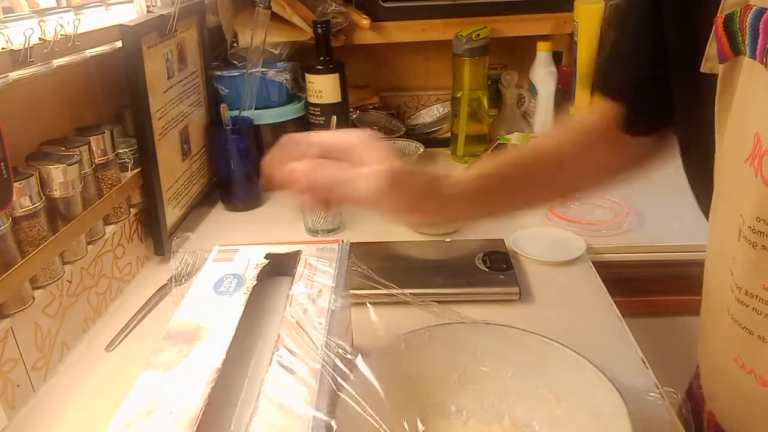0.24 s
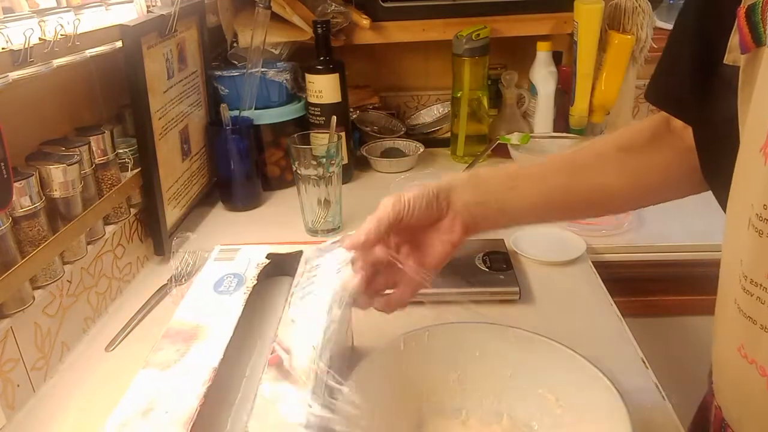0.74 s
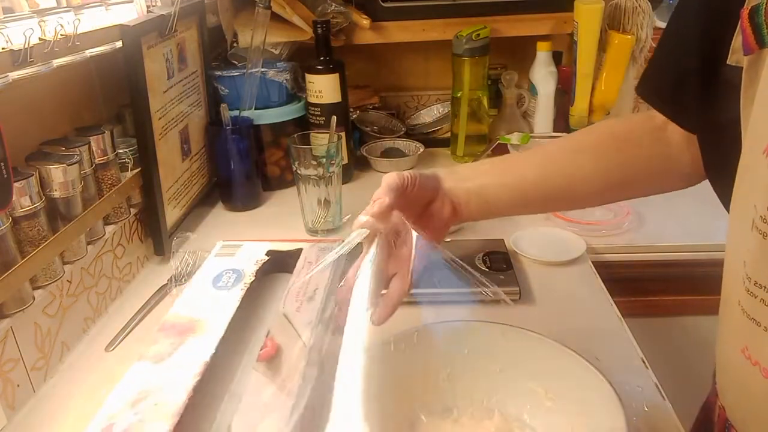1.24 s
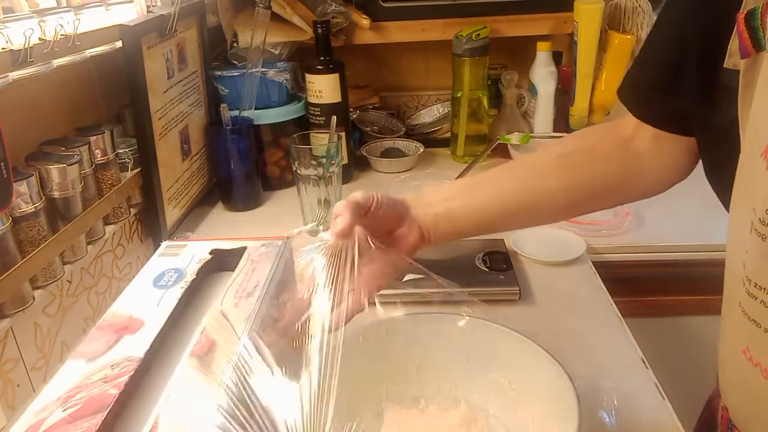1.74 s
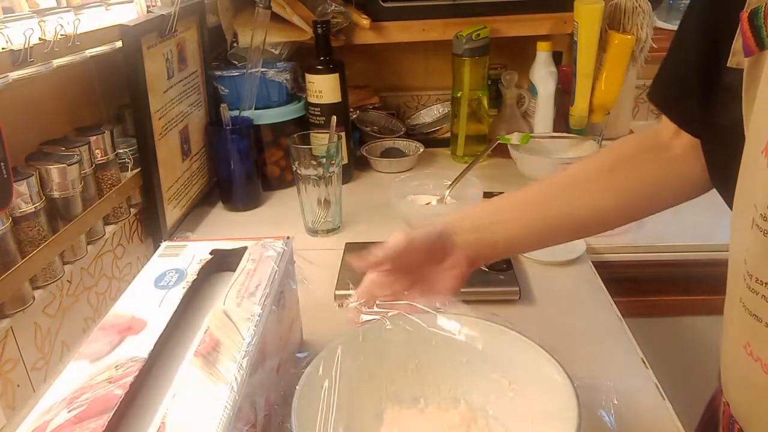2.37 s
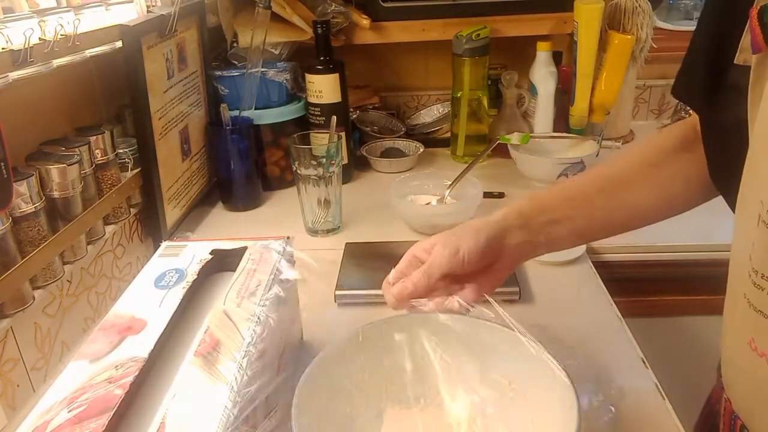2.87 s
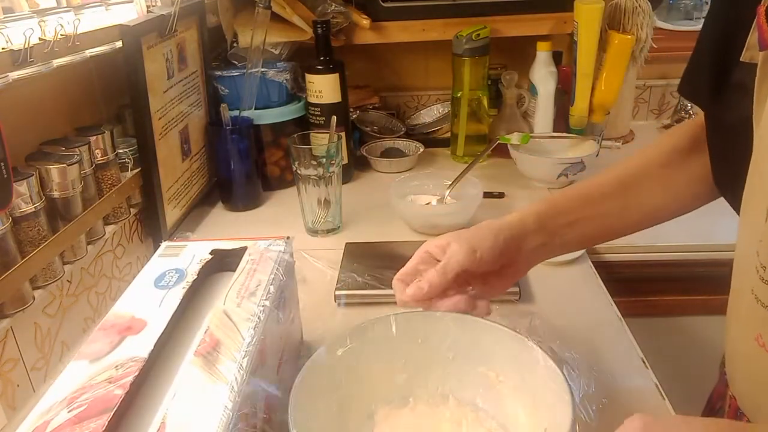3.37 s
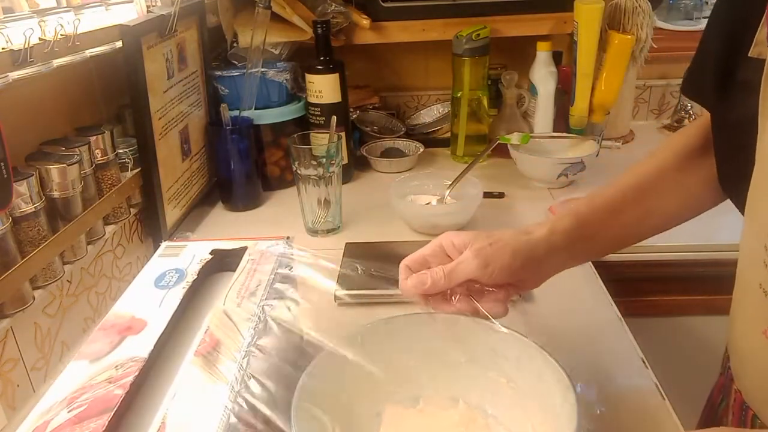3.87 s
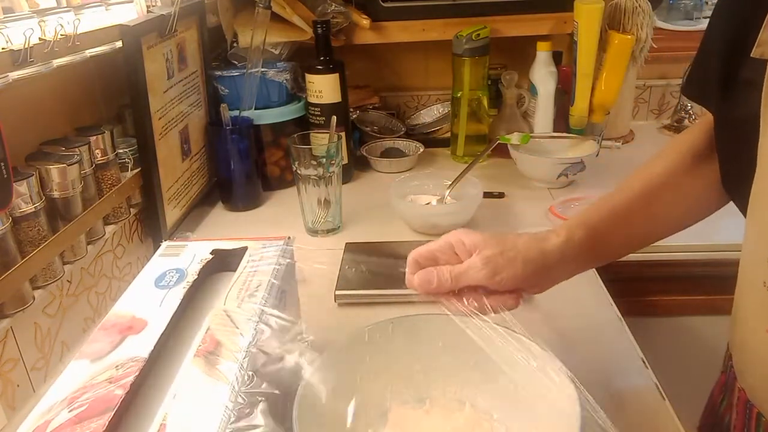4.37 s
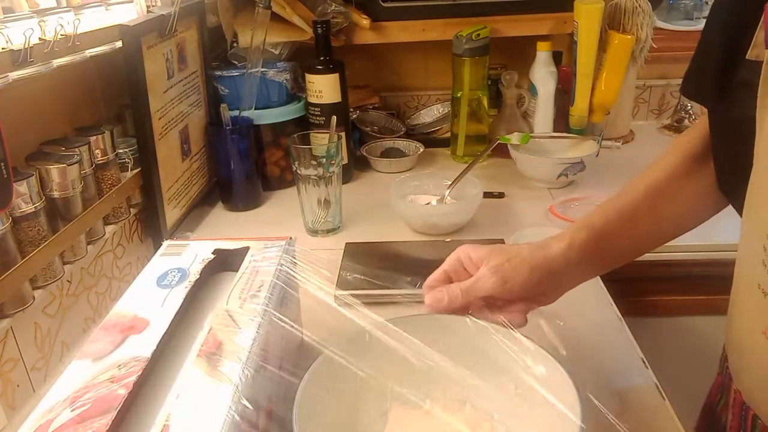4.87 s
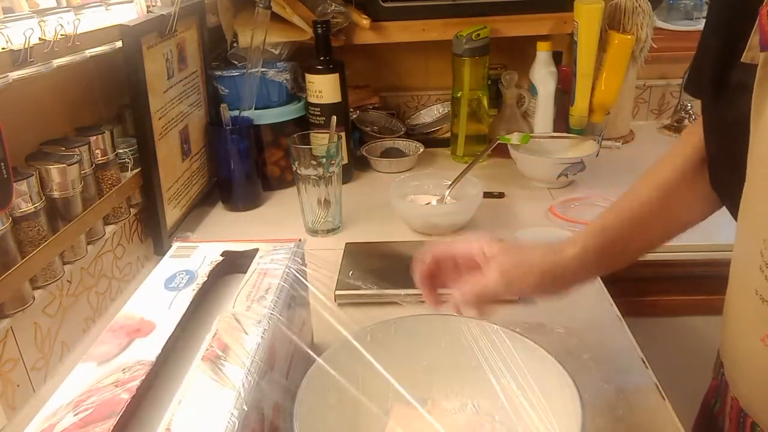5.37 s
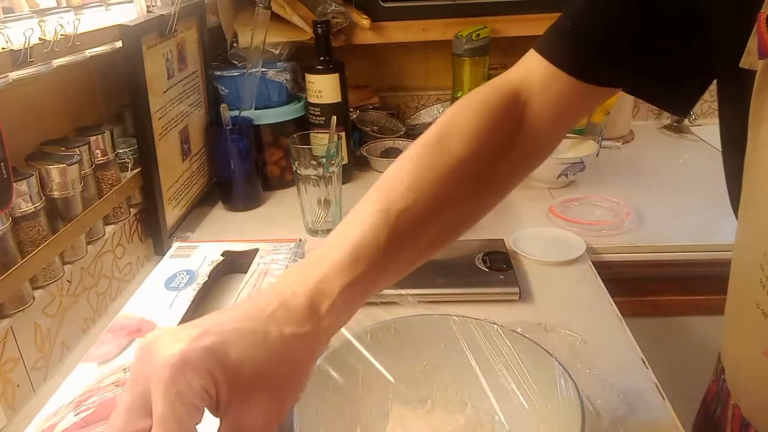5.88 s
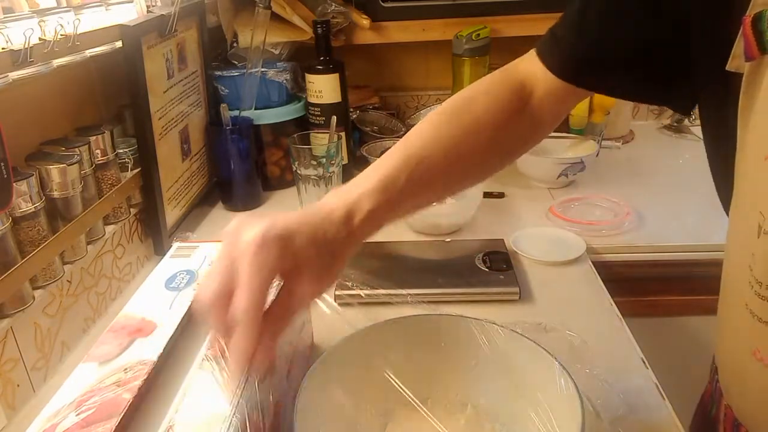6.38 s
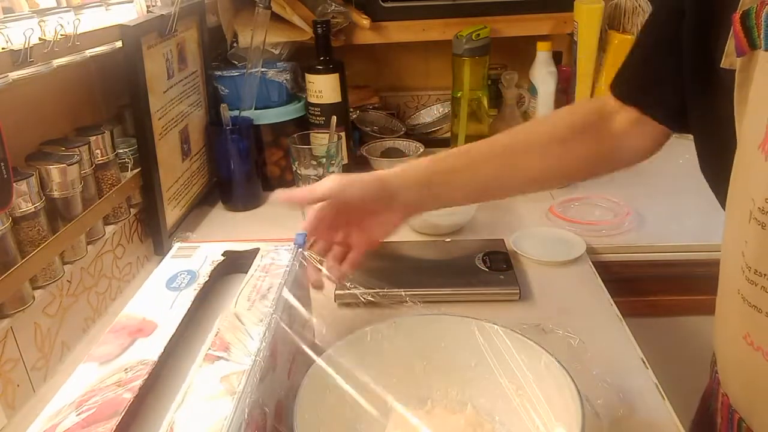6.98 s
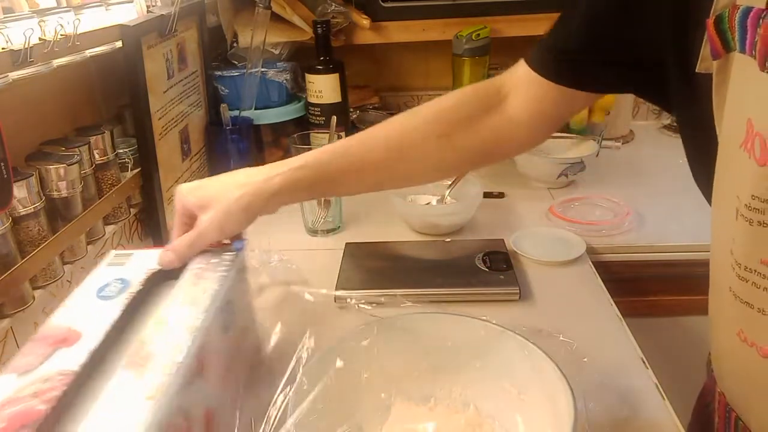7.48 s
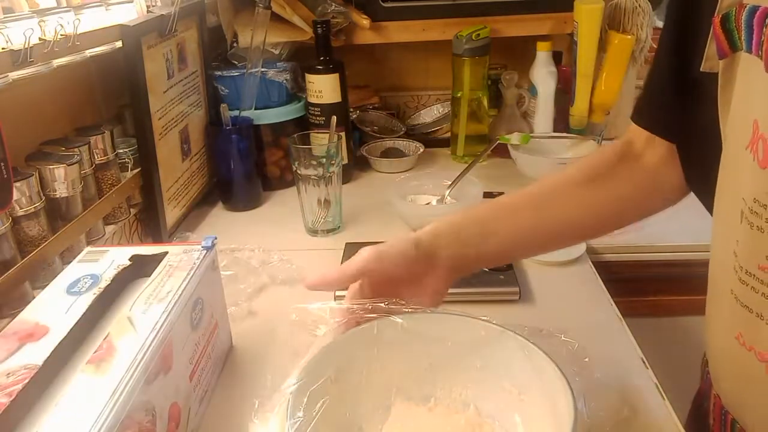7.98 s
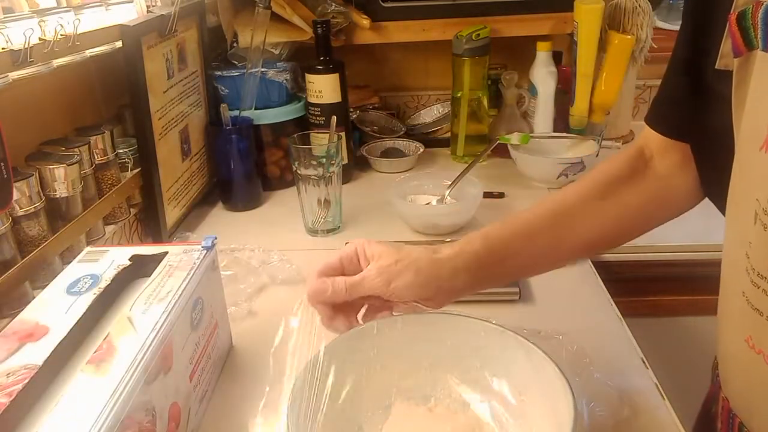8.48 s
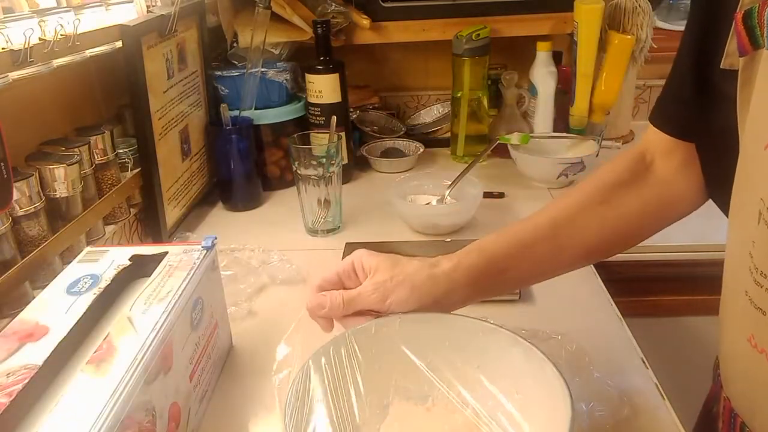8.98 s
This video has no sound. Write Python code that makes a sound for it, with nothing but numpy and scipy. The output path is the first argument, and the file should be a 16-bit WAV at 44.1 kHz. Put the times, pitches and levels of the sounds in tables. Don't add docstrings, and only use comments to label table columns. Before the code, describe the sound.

Close stereo pickup in a small hard kitchen. Loud crackling and box thumps open as film is pulled out, then fade to near quiet. Bright snaps and rustling flurries follow as the film is draped over a bowl. A cutting movement brings a sharp crackle and hollow thuds, then softer pressing, small creaky snaps and faint glass taps over a low hum.

```python
import sys
import numpy as np
from scipy import signal
from scipy.fft import rfft, irfft
from scipy.io import wavfile
from scipy.ndimage import uniform_filter1d

SR = 44100
rng = np.random.default_rng(int(sys.argv[2]) if len(sys.argv) > 2 else 0)


def nominal_scale(level):
    x = np.asarray(level, float) / 20
    return 10 ** x


def waveform_to_disk(signal):
    frames = np.transpose(np.atleast_2d(signal))
    scaled = np.clip(frames, -1, 1) * 32767
    samples = np.round(scaled).astype(np.int16)
    wavfile.write(sys.argv[1], SR, samples)


N = 406602

# columns start_s [s], left_right_db [dB]
HAND_PLACE = [(0.0, 0.5), (1.56, 2), (1.93, 3.5), (2.7, -1.0), (3.0, 1.5), (5.83, 0.5), (6.29, 2.5),
              (6.96, 2.0), (9.22, 1.0)]
# columns freq_hz [Hz], level_db [dB per Hz]
FOLD_SPECTRUM = [(210, -34.5), (350, -13.5), (618, -10.5), (801, -4.5), (935, -8.5), (1160, -7),
                 (3500, -13), (4550, -34.5), (7700, -120)]
# columns freq_hz [Hz], level_db [dB per Hz]
SNAP_SPECTRUM = [(1200, -31.5), (2000, -15), (3300, -4.5), (5500, -1), (7550, 1), (10000, -3),
                 (12500, -0.5), (15500, -3.5), (17000, -6)]


def evened(x):
    return x / np.sqrt(np.mean(x ** 2) + 1e-20)


def read(points, hz):
    freq_hz, value = np.transpose(points)
    return np.interp(np.log(hz + 1), np.log(freq_hz + 1), value)


def follow(rows):
    knot_s, *columns = np.transpose(rows)
    return [np.interp(np.arange(N) / SR, knot_s, column) for column in columns]


def colour(x, points):
    hz = abs(np.fft.fftfreq(4096, 1 / SR))
    log_gain = np.log(nominal_scale(read(points, hz)) + 1e-5)
    taps = np.fft.ifft(np.exp(np.conj(signal.hilbert(log_gain)))).real[:2048]
    return signal.oaconvolve(x, taps[None] / np.linalg.norm(taps))[:, :N]


def resonate(x, hz, width_hz):
    return signal.lfilter(*signal.iirpeak(hz, hz / width_hz, SR), x)


def pair(same):
    a, b = rng.standard_normal((2, N))
    same = np.clip(same, 0, 1)
    return np.array([a, same * a + np.sqrt(1 - same ** 2) * b])


def lumpy(ms):
    size = int(ms * SR / 1000)
    once = uniform_filter1d(rng.standard_normal(N), size)
    return evened(uniform_filter1d(once, size))


def placed(at, size, pan_db, lag_per_db):
    out = np.zeros((2, N))
    for port, sign in zip(out, (1, -1)):
        lead = np.round(sign * pan_db * lag_per_db).astype(int)
        np.add.at(port, np.clip(at - lead, 0, N - 1), size * nominal_scale(sign * pan_db / 2))
    return out


def patchy(x, depth_db):
    hz, t, z = signal.stft(x, SR, nperseg=256)
    patches = rng.standard_normal((len(t), len(hz))).T
    patches = uniform_filter1d(patches, size=7, axis=0)
    patches = evened(uniform_filter1d(patches, size=9, axis=1))
    return signal.istft(z * nominal_scale(depth_db * patches), SR, nperseg=256)[1][:, :N]


def air():
    # columns freq_hz [Hz], width_hz [Hz], level_db [dB]
    hum_lines = [(320.4, 34, -79), (375.3, 22, -71), (417, 39, -78), (477.5, 16, -79)]
    # columns freq_hz [Hz], level_db [dB per Hz]
    air_spectrum = [(28, -32.5), (50, -11.5), (90, -2.5), (150, -9), (250, -5), (400, -10.5), (630, -19),
                    (1000, -28.5), (2500, -38.5), (4500, -36), (8000, -35), (16000, -39.5)]
    hum = 0
    for hz, width_hz, level_db in hum_lines:
        line = resonate(resonate(pair(same=0.7), hz, width_hz), hz, width_hz)
        hum = hum + nominal_scale(level_db) * evened(line)
    return nominal_scale(-66.5) * evened(colour(pair(same=0.54), air_spectrum)) + hum


def kitchen(x):
    # columns freq_hz [Hz], t60_s [s]
    room_decay = [(200, 0.73), (700, 0.22), (2000, 0.24), (6000, 0.19), (16000, 0.13)]
    taps = np.zeros((2, SR // 2))
    slots = np.arange(100, SR // 2 - 20, 20)
    at = slots + rng.integers(0, 20, (2, (SR // 2 - 101) // 20))
    np.put_along_axis(taps, at, rng.choice([-1., 1.], at.shape), 1)
    hz, t, z = signal.stft(taps, SR, nperseg=256)
    decay = nominal_scale(-60 * t / read(room_decay, hz)[:, None])
    tail = signal.istft(z * decay, SR, nperseg=256)[1]
    return signal.fftconvolve(x, tail / np.linalg.norm(tail[0]), axes=1)[:, :N]


def handling():
    # columns peak_s [s], crackle_db [dB], swell_s [s], fade_s [s], scuff_db [dB]
    grips = [(0.035, -28, 0.089, 0.2, -25), (0.134, -38, 0.15, 0.1, -32.5),
             (0.662, -43.5, 0.054, 0.18, -44.5), (0.838, -32.5, 0.2, 0.17, -34),
             (1.217, -55.5, 0.096, 0.44, -55.5), (1.334, -50.5, 0.012, 0.6, -58), (1.7, -66, .25, .25, -58),
             (1.958, -60.5, 0.25, 0.27, -59.5), (2.199, -58, 0.091, 0.41, -78),
             (6.0, -77, 0.31, 0.14, -50.5), (6.22, -56.5, 0.033, 0.52, -58.5),
             (6.38, -38.5, 0.18, 0.22, -38.5), (6.44, -41.5, .1, 0.064, -42.5),
             (6.64, -40.5, 0.32, 0.24, -47), (6.692, -31.5, 0.054, 0.13, -22.5),
             (7.269, -42, 0.068, 0.25, -33.5), (7.359, -45, 0.21, 0.1, -38.5),
             (7.665, -46.5, 0.062, 0.17, -48), (0.19, -60, 0.029, 0.084, -40),
             (7.145, -55.5, 0.071, 0.054, -55)]
    # columns peak_s [s], crackle_db [dB], swell_s [s], fade_s [s], scuff_db [dB]
    presses = [(2.529, -55.5, 0.035, 0.52, -62), (2.724, -35, 0.014, 0.17, -54),
               (2.954, -36.5, 0.097, 0.16, -43.5), (3.315, -44.5, 0.044, 0.17, -55),
               (3.42, -47.5, 0.12, .3, -53), (3.556, -43, 0.012, 0.2, -51), (3.63, -34, 0.35, 0.17, -47.5),
               (3.95, -52.5, 0.034, 0.49, -58), (4.12, -34, 0.024, 0.22, -52.5),
               (4.189, -47.5, 0.03, 0.074, -47), (4.392, -44.5, 0.13, 0.17, -56),
               (4.501, -35, 0.12, 0.15, -41), (4.68, -50.5, 1, 0.19, -51), (4.95, -55.5, 0.18, 0.84, -59.5),
               (5.138, -37.5, 0.029, 0.13, -51), (5.248, -53.5, 0.56, 0.09, -58.5),
               (8.272, -55.5, 0.18, 0.21, -63.5), (8.358, -47.5, 0.017, 0.13, -63),
               (8.463, -39.5, 0.12, 0.091, -46.5), (8.76, -50, 0.093, 0.11, -40.5),
               (8.661, -58, 0.12, .2, -57), (8.96, -52.5, 0.58, 0.085, -59)]
    # columns start_s [s], level_db [dB]
    slack = [(0, -94), (1.0, -72), (1.15, -70.5), (2.3, -75), (2.5, -73.5), (3.3, -66.5), (3.8, -62.5),
             (4.3, -68), (5.45, -60), (5.66, -84.5), (6.15, -67.5), (6.94, -78.5), (7.21, -77), (7.5, -64),
             (7.82, -64), (7.92, -93), (8.19, -96), (8.56, -62)]
    swing_db = 37.5
    scuff_lag_s = 0.012
    slack_db, = follow(slack)
    t = np.arange(N) / SR
    film_power, scuff_power = nominal_scale(2 * slack_db), nominal_scale(2 * (slack_db - 7.5))
    for peak_s, crackle_db, swell_s, fade_s, scuff_db in grips + presses:
        near = slice(max(round((peak_s - 2 * swell_s) * SR), 0), round((peak_s + 2 * fade_s) * SR))
        since_s = t[near] - peak_s
        drop_db = swing_db * np.maximum(-since_s / swell_s, since_s / fade_s)
        film_power[near] += nominal_scale(2 * (crackle_db - drop_db))
        since_s = since_s - scuff_lag_s
        drop_db = swing_db * np.maximum(-since_s / swell_s, since_s / (0.99 * fade_s))
        scuff_power[near] += nominal_scale(2 * (scuff_db - drop_db))
    return 10 * np.log10(film_power), 10 * np.log10(scuff_power)


def box_knocks():
    knocks = [(0.032, -13, 167), (0.059, -14, 162), (0.116, -17, 167), (0.672, -29, 167), (0.7, -32, 157),
              (0.77, -27.5, 171), (0.829, -28, 309), (0.918, -34, 318), (1.488, -41.5, 369.5),
              (1.961, -47, 350), (2.941, -36, 495), (3.555, -36, 173), (3.936, -38, 500),
              (4.182, -33.5, 480), (4.502, -34, 538), (4.681, -30.5, 183), (5.015, -42, 180),
              (5.139, -37, 186), (5.956, -43.5, 487), (6.367, -27, 380), (6.42, -29.5, 154.5),
              (6.706, -28, 162), (6.729, -19, 159.6), (7.011, -41, 161), (7.275, -22.5, 168),
              (7.323, -20.5, 179), (7.358, -21, 167), (7.684, -39, 495), (8.668, -35.5, 173),
              (8.759, -38, 479), (8.757, -34, 197), (8.757, -43, 814), (0.655, -36, 166), (8.772, -37, 309),
              (6.71, -23.5, 318), (6.742, -26, 168), (6.69, -33.5, 52), (7.269, -32, 55), (1.5, -42, 62)]
    t, thuds, rings = np.arange(4000) / SR, np.zeros(N), np.zeros(N)
    grit = rng.standard_normal((len(knocks), 4000)) * nominal_scale(-60 * t / 0.073)
    for (start_s, peak_db, pitch_hz), noise in zip(knocks, grit):
        at = round(start_s * SR)
        phase = 2 * np.pi * pitch_hz * (t + 0.0019 * (1 - np.exp(-t / 0.0038)))
        envelope = nominal_scale(peak_db - 3.5 - 60 * t / 0.15) * (1 - np.exp(-t / 0.012))
        rings[at:at + len(t)] += envelope * np.sin(phase)
        thuds[at:at + len(t)] += nominal_scale(peak_db) * noise
    return thuds, rings


def counter_shake(scuff_db):
    # columns start_s [s], level_db [dB]
    lean = [(0, -65), (2.3, -75), (3.21, -68.5), (3.39, -53.5), (3.64, -52.5), (3.77, -63.5), (4.24, -58.5),
            (6.9, -61.5), (9.22, -61.5)]
    jolt_db, jolt_s = -14.5, 0.1
    lean_db, = follow(lean)
    jolt = nominal_scale(jolt_db) * uniform_filter1d(nominal_scale(scuff_db), size=round(jolt_s * SR))
    noise = pair(same=0.81)
    rumble = resonate(resonate(noise, 86.2, 23), 84, 41) + nominal_scale(-23) * resonate(noise, 82, 25)
    return (nominal_scale(lean_db) + jolt) * evened(rumble)


def box():
    # columns freq_hz [Hz], width_hz [Hz], level_db [dB]
    panel_modes = [(167, 34, 13), (318, 50, 6), (495, 14, 6.5), (807, 13, -39.5), (1470, 100, -17.5)]
    right_lag_s = 0.00034
    scuff_db = handling()[1]
    thuds, rings = box_knocks()
    rub = pair(same=0.92) * nominal_scale(scuff_db + 11.5 + 3.3 * lumpy(ms=7.2))
    drive = nominal_scale(-5.0) * rub + thuds
    panels = sum(nominal_scale(db) * resonate(drive, hz, 1.26 * width_hz) for hz, width_hz, db in panel_modes)
    board = resonate(resonate(rub + nominal_scale(-10.5) * thuds, 390, 510), 390, 510)
    left, right = panels + nominal_scale(-5.0) * board + rings
    right = np.interp(np.arange(N) - right_lag_s * SR, np.arange(N), right)
    return np.array([left, right]) + counter_shake(scuff_db)


def bowl(film):
    # columns freq_hz [Hz], level_db [dB], t60_s [s]
    glass_modes = [(840, -15, 0.2), (1585, -14, 0.28), (2070, -10.5, 0.045), (4113, -13, 0.13),
                   (5600, -22.5, 0.12)]
    # columns start_s [s], fingertip_db [dB], knuckle_on_rim_db [dB], fingernail_db [dB]
    touches = [
        (2.80, -45, -70, -66),
        (3.101, -53, -66, -52),
        (8.36, -64, -67, -72),
        (8.575, -66, -42, -77),
        (8.662, -60, -47, -77),
        (8.735, -56, -35, -80),
        (8.83, -60, -51, -75),
        (8.938, -52, -35, -75),
        (8.996, -64, -40, -75),
        (9.152, -46, -55, -72),
    ]
    drive = nominal_scale(-46.5) * film.mean(0) * np.ones((3, 1))
    for start_s, *touch_db in touches:
        drive[:, round(start_s * SR)] += nominal_scale(np.array(touch_db))
    t, modes = np.arange(SR // 3) / SR, []
    for hz, level_db, t60_s in glass_modes:
        close_pair = np.sin(2 * np.pi * hz * t) + .45 * np.sin(2 * np.pi * 1.012 * hz * t)
        modes.append(nominal_scale(level_db - 60 * t / t60_s) * close_pair)
    modes = np.array(modes)
    responses = np.array([modes[:2].sum(0), modes[2], modes[3:].sum(0)])
    return signal.fftconvolve(drive, responses, axes=1)[:, :N].sum(0)


def flurries():
    # columns start_s [s], peak_db [dB], deep_db [dB re peak], t60_s [s], left_right_db [dB]
    flurry_events = [(0.0024, -13.5, -19, 0.026, 1.5), (0.0554, -13, -13.5, 0.029, 0.5),
                     (0.1206, -15.5, -23, 0.03, 7), (0.831, -21.5, -18, 0.043, 0),
                     (2.715, -25.5, -16.5, 0.024, 0), (2.7218, -14.5, -19, 0.019, 3.5),
                     (2.7262, -16.5, -22, 0.03, -5.5), (2.9506, -19.5, -16, 0.043, 0.5),
                     (2.9585, -26.5, -19, 0.03, 2.5), (3.0185, -24, -34, 0.027, 3),
                     (3.4172, -27.5, -20, 0.037, 0.5), (3.48, -30, -25, 0.03, 0.5),
                     (3.5047, -40, -26, 0.027, 1), (3.536, -22.5, -19.5, 0.018, 2),
                     (3.6217, -26, -10, 0.034, 0.5), (3.6465, -25.5, -18, 0.06, -0.5),
                     (3.6961, -23, -28, 0.041, 0.5), (4.117, -36, -22, 0.03, 1),
                     (4.1337, -22, -14.5, 0.026, -1), (4.1414, -19.5, -16, 0.026, 1),
                     (4.1847, -21, -12.5, 0.03, 3.5), (4.3704, -27, -29, 0.03, 3.5),
                     (4.3803, -26.5, -24.5, 0.025, 1), (6.3774, -18, -16.5, 0.039, 2.5),
                     (6.4188, -26.5, -7.5, 0.044, -4.5), (6.5819, -26, -25, 0.019, 9),
                     (6.6145, -29, -23.5, 0.03, 5), (6.6832, -11.5, -24.5, 0.022, -1),
                     (6.6964, -25.5, -10.5, 0.03, 3), (7.663, -40, -10, 0.03, 2),
                     (8.2442, -51, -16, 0.03, 10), (8.321, -45, -18, 0.034, 1.0),
                     (8.4036, -42, -24, 0.033, 0), (8.4317, -31.5, -17, 0.033, 0),
                     (8.4555, -20, -21, 0.025, 5), (8.5978, -30.5, -22, 0.039, 3.5),
                     (8.7176, -31.5, -17, 0.03, 1.5), (8.9082, -40.5, -8, 0.041, -1),
                     (9.091, -40, -13, 0.035, 1.5)]
    # columns start_s [s], peak_db [dB], deep_db [dB re
    # peak], t60_s [s], left_right_db [dB]
    further_bursts = [(2.7256, -7, -23, 0.007, 1.5), (2.7222, -27, -24, 0.007, 1.5),
                      (3.0193, -19, -36, .008, -1.5), (4.1874, -27, -14, 0.011, 2),
                      (6.6842, -13, -31, 0.011, 2.5), (3.341, -31, -11, 0.034, 3.5),
                      (3.446, -30, -21, .02, 1.5), (7.28, -31, -14.5, 0.095, 1.5),
                      (7.305, -30, -12, .08, 1.5), (7.338, -27, -10, 0.095, 1), (8.629, -38, -19, 0.046, 1),
                      (8.69, -40.5, -14, 0.052, 2.5), (8.76, -39, -5, 0.083, 3), (8.87, -42, -14, .05, 1.5),
                      (8.955, -45, -14, 0.063, -0.5), (5.96, -57.5, -3.5, 0.075, 2),
                      (1.3352, -25, -16, .007, 1), (0.803, -27, -10, .03, 1), (0.844, -22, -8, .04, 1),
                      (7.352, -22, -14, .03, 1), (7.688, -40, -6, .06, 0), (9.03, -46, -8, .08, 1),
                      (9.11, -46, -10, .08, 1), (9.17, -45, -8, .1, 1), (8.79, -40, -8, .08, 1)]
    start_s, peak_db, deep_db, t60_s, pan_db = np.transpose(flurry_events + further_bursts)[:, :, None]
    after = np.arange(1800)
    t, t60_s = after / SR, np.clip(t60_s, .003, .12)
    chance = rng.standard_normal((len(start_s), 1800, 2))
    rise = 1 - np.exp(-(t + 1 / SR) / (0.049 * t60_s))
    burst = nominal_scale(-60 * t / t60_s) * rise * chance[..., 0] * abs(chance[..., 1])
    burst /= abs(burst).max(1, keepdims=True)
    at = (np.round(start_s * SR).astype(int) + after).ravel()
    pan_db = (pan_db + 0 * after).ravel()
    bright = placed(at, (burst * nominal_scale(peak_db - 2.5)).ravel(), pan_db, lag_per_db=0.7)
    deep = placed(at, (burst * nominal_scale(peak_db + deep_db + 8.5)).ravel(), 0.55 * pan_db, lag_per_db=2.4)
    return colour(bright, SNAP_SPECTRUM) + colour(deep, FOLD_SPECTRUM)


def snaps():
    # columns start_s [s], peak_db [dB], deep_db [dB re peak], pitch_hz [Hz]
    pull_snaps = [(0.0261, -18, -9, 810), (0.1131, -13.5, -19.5, 965), (0.6532, -29.5, -27, 665),
                  (0.6925, -30, -13.5, 735), (0.7153, -37.5, -11.5, 730), (0.7648, -27, -15.5, 660),
                  (0.8295, -24, -2, 1724), (0.9167, -35.5, -4.5, 843), (1.1742, -44.5, -25, 708),
                  (1.335, -29.5, -8, 680), (1.6072, -45, -10, 670),]
    drape_snaps = [(2.5366, -33, -17.5, 1470), (2.5648, -34.5, -16.5, 1300), (2.7252, -25, -10, 1080),
                   (2.8993, -32.5, -14.5, 820), (2.9439, -38, -10.5, 714), (3.018, -22, -22, 2560),
                   (3.3054, -38.5, -9.5, 1480), (3.3401, -29, -14, 1467), (3.393, -31.5, -19, 800),
                   (3.4132, -32, -16.5, 3520), (3.444, -27.5, -15.5, 1210), (3.5342, -26, -14, 1540),
                   (3.5538, -24, -13, 2290), (3.703, -23.5, -18.5, 3200), (3.839, -37.5, -19.5, 760),
                   (3.936, -37.5, -41, 727), (4.097, -39, -19, 1110), (4.119, -27, -28, 1410),
                   (4.1843, -27.5, -12.5, 1260), (4.3916, -37, -8, 2320), (4.456, -38, -11.5, 810),
                   (4.481, -26, -8, 790), (4.6778, -29.5, -11, 663), (4.9034, -37.5, -13, 1530),
                   (4.9498, -27, -20, 1940), (5.132, -30, -8.5, 874), (5.4, -43, -39, 744)]
    cut_snaps = [ (5.7895, -46.5, -16, 1470), (6.0003, -38, -17, 705), (6.217, -29, -29.5, 790),
                 (6.3634, -20, -18.5, 660), (6.6422, -22, -21.5, 2320), (6.684, -15.5, -7, 3086),
                 (7.2624, -30.5, -4, 637), (7.2689, -21.5, -13.5, 740), (7.3208, -19.5, -11, 840),
                 (7.3558, -19, -10.5, 794), (8.3614, -29, -12.5, 870), (8.4313, -29, -16.5, 780),
                 (8.4618, -20.5, -13.5, 1550), (8.5743, -39, -11.5, 2040), (8.6625, -42, -4, 785),
                 (8.737, -27.5, -17, 794), (8.8309, -32, -10.5, 820), (8.9373, -30, -5.5, 853),
                 (8.995, -37.5, -1, 790), (9.1413, -36, -5, 756)]
    further_snaps = [(0.0816, -19, -15, 1020), (0.7815, -30, -16.5, 1500), (1.2393, -41, -23, 654),
                     (1.4186, -38, -9.5, 1970), (1.699, -46.5, -11.5, 729), (1.8185, -47, -16, 680),
                     (2.189, -44, -33, 2570), (2.222, -42.5, -11.5, 2030), (3.5684, -24, -17.5, 2560),
                     (3.599, -29.5, -10, 1590), (3.6514, -39, -15, 3020), (4.129, -30.5, -16, 1430),
                     (4.4993, -31.5, 5, 823), (4.5143, -20.5, -6.5, 758), (4.539, -29, -4.5, 818),
                     (4.9826, -38.5, -9, 800), (5.1377, -26.5, -11, 790), (5.25, -38.5, -12.5, 1120),
                     (6.4397, -28, -13, 870), (6.502, -34.5, -32, 2300), (6.5787, -32.5, -22.5, 811),
                     (6.601, -31, -25, 727), (6.7309, -19, -12, 946), (7.23, -58, -3, 796),
                     (7.2918, -23.5, -10, 730), (8.273, -49, -5.5, 810), (8.4893, -35.5, -7.5, 1005),
                     (9.0617, -50, -1.5, 980)]
    events = pull_snaps + drape_snaps + cut_snaps + further_snaps
    start_s, peak_db, deep_db, pitch_hz = np.transpose(events)[:, :, None]
    after = np.arange(900)
    t, chance = after / SR, rng.random((len(start_s), 900, 3))
    clicks = (chance[..., 0] < .3) * (2 * chance[..., 1] - 1)
    burst = nominal_scale(-60 * t / 0.04) * (1 - np.exp(-t / 0.0006)) * clicks
    burst[:, 0] = 0.34
    burst /= abs(burst).max(1, keepdims=True)
    twang = nominal_scale(-60 * t / 0.058) * np.sin(2 * np.pi * pitch_hz * t) * (1 - np.exp(-t / 0.00096))
    at = (np.round(start_s * SR).astype(int) + after).ravel()
    hand_db = np.interp(start_s, *np.transpose(HAND_PLACE))
    pan_db = (hand_db + 3.0 * (chance[:, :1, 2] - .4) + 0 * after).ravel()
    bright = placed(at, (burst * nominal_scale(peak_db + 1.5)).ravel(), pan_db + 2.07, lag_per_db=1.21)
    deep = placed(at, (burst * nominal_scale(peak_db + deep_db + 5.5)).ravel(), 0.49 * pan_db, lag_per_db=1.5)
    patch = placed(at, (twang * nominal_scale(peak_db + deep_db - 2.0)).ravel(), 0.45 * pan_db, lag_per_db=5.0)
    return colour(bright, SNAP_SPECTRUM) + colour(deep, FOLD_SPECTRUM) + patch


def swarm(level_db, pan_db, per_s, spread_db, clump_db, wide_db):
    hit = rng.random(N) < per_s / SR
    sign, place = rng.standard_normal(N), rng.standard_normal(N)
    clumps_db = clump_db * (lumpy(ms=4.3) + 0.54 * lumpy(ms=5.0))
    size_db = spread_db * np.minimum(rng.exponential(1, N), 3.5) + clumps_db
    size = evened(hit * sign * nominal_scale(size_db))
    return placed(np.arange(N), size * nominal_scale(level_db), pan_db + wide_db * place, lag_per_db=2.07)


def crackle():
    # columns freq_hz [Hz], level_db [dB per Hz]
    crease_spectrum = [(1200, -37.5), (2000, -17), (3300, -5), (4100, -0.5), (6500, -2.5), (7550, 2),
                       (8600, -2), (10000, -2.5), (12500, -1.5), (15500, -4), (17000, -3.5)]
    level_db, scuff_db = handling()
    deep_db = -3.5 + 0.094 * (scuff_db - level_db)
    pan_db, = follow(HAND_PLACE)
    bright = swarm(level_db + 0.5, pan_db + 0.72, per_s=9000, spread_db=4.5, clump_db=2.5, wide_db=2.5)
    deep = swarm(level_db + deep_db - 7.5, 0.85 * pan_db, per_s=2500, spread_db=0.5, clump_db=0.5, wide_db=5.5)
    return patchy(colour(bright, crease_spectrum) + colour(deep, FOLD_SPECTRUM), depth_db=2.5)


def scene():
    rustle = crackle()
    cracks = patchy(snaps() + flurries(), depth_db=2.5)
    film = rustle + cracks
    reflections = kitchen(nominal_scale(-5.0) * rustle + nominal_scale(-6.0) * cracks)
    return film + reflections + bowl(film) + box() + air()


def band_limit(x):
    return signal.sosfilt(signal.butter(12, 16840, fs=SR, output="sos"), x)


def record(dry):
    # columns freq_hz [Hz], left_right_db [dB]
    port_balance = [(60, -2.1), (500, -2), (2000, -0.5), (4500, -2), (8000, -2), (14000, 1)]
    hz = np.fft.rfftfreq(N, 1 / SR)
    top_cut = np.clip((15850 - hz) / 150 + 1, nominal_scale(-46), 1)
    bass_cut = 1 / np.sqrt(1 + (45 / (hz + 1)) ** 4)
    ports = nominal_scale(np.array([[.5], [-.5]]) * read(port_balance, hz))
    mix = irfft(rfft(dry) * top_cut * bass_cut * ports, N)
    return band_limit(mix)


dry = scene()
out = record(dry)
waveform_to_disk(out)
```